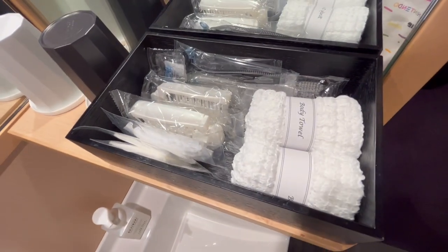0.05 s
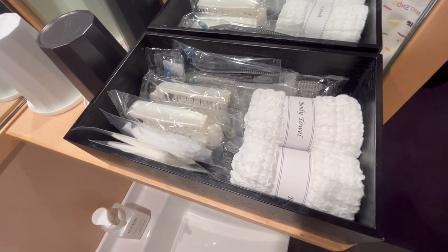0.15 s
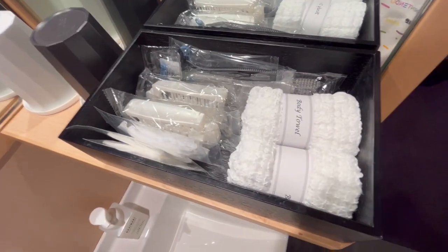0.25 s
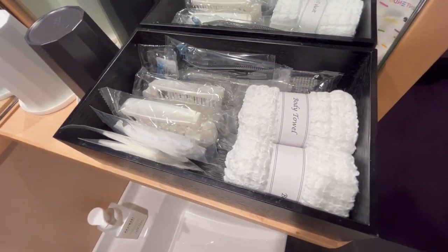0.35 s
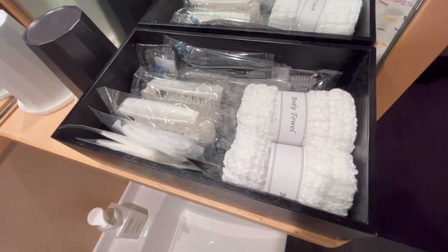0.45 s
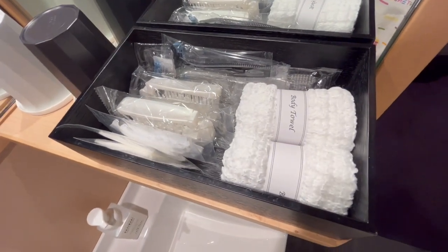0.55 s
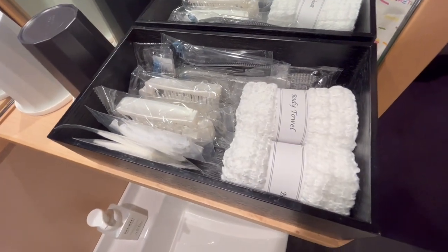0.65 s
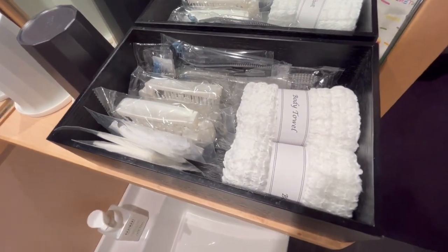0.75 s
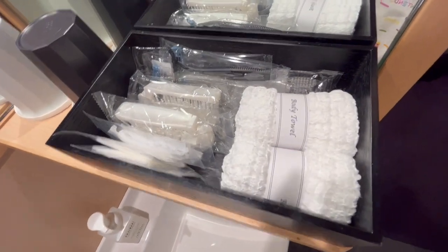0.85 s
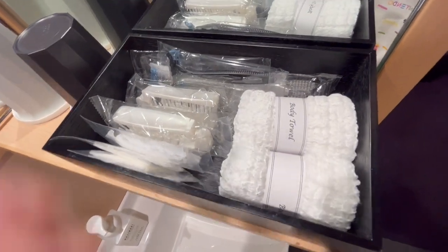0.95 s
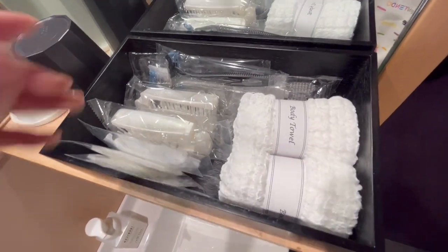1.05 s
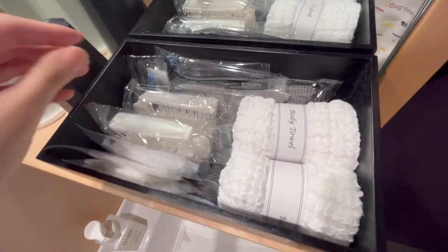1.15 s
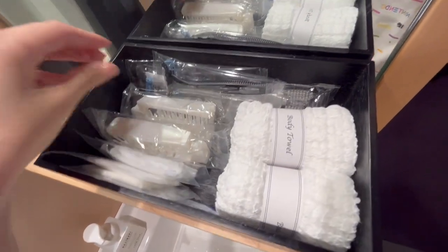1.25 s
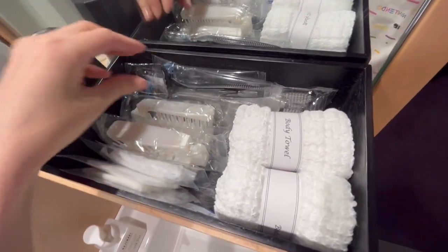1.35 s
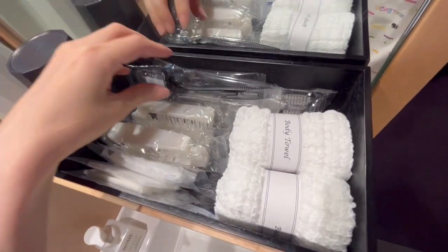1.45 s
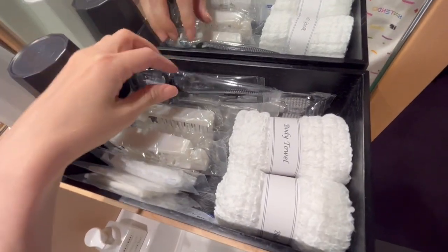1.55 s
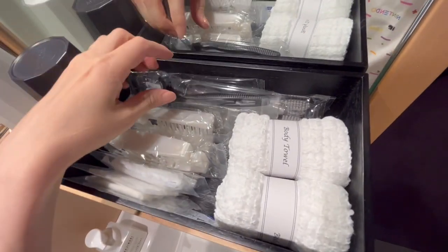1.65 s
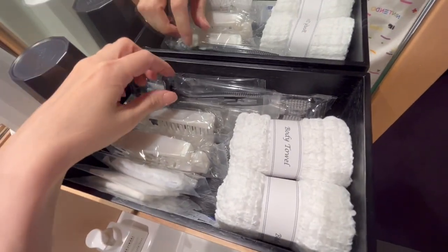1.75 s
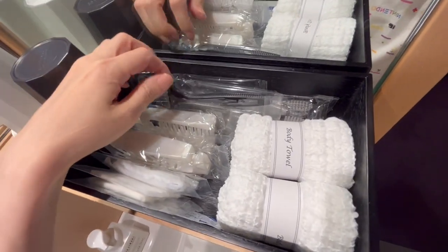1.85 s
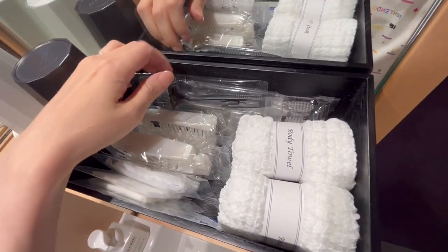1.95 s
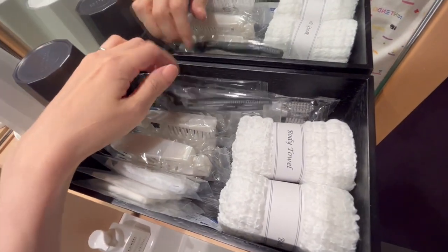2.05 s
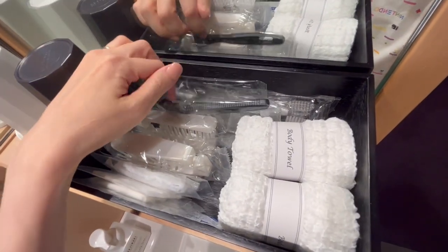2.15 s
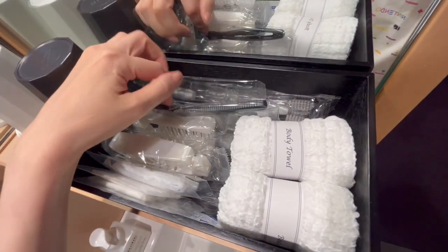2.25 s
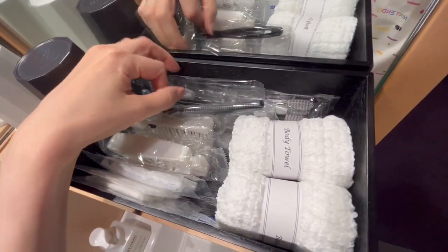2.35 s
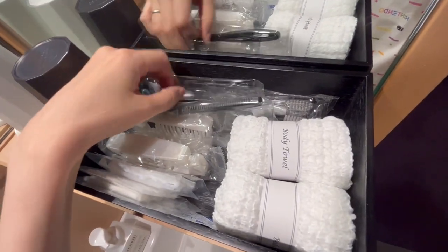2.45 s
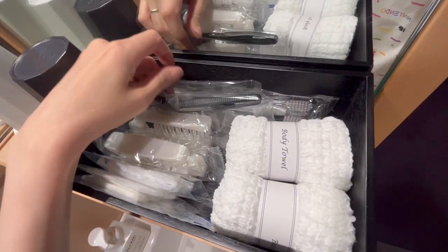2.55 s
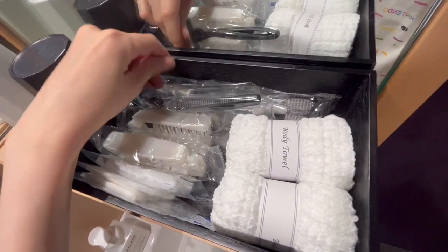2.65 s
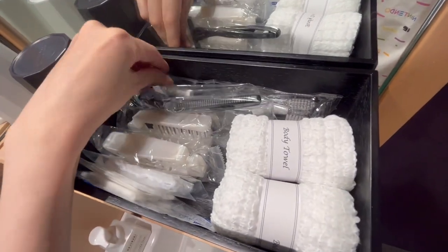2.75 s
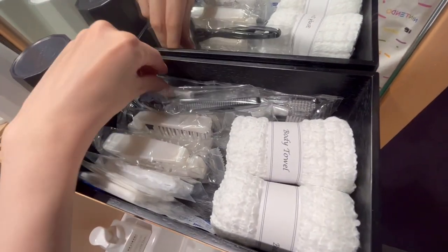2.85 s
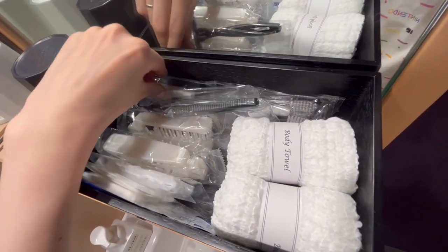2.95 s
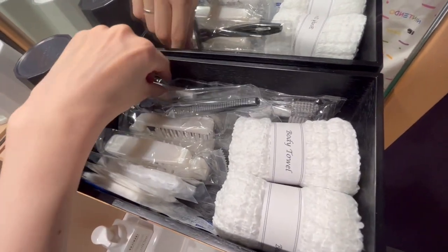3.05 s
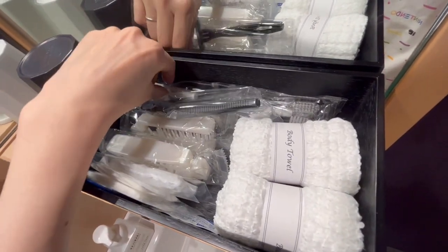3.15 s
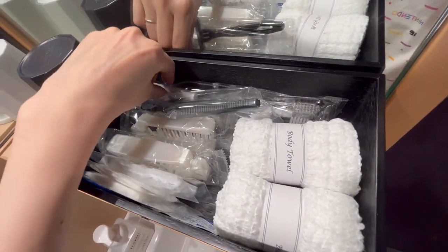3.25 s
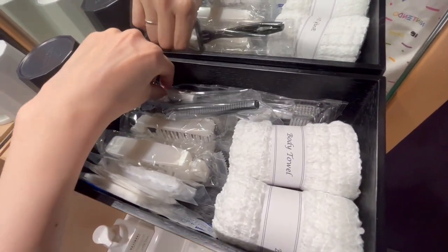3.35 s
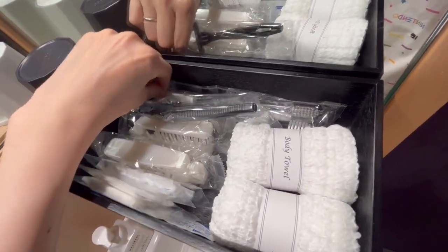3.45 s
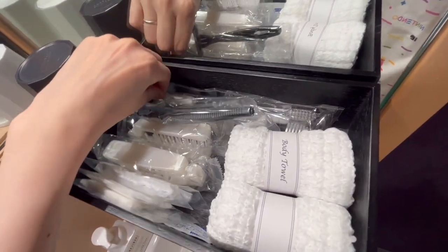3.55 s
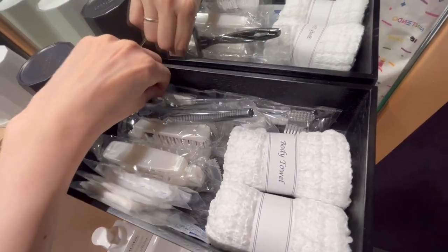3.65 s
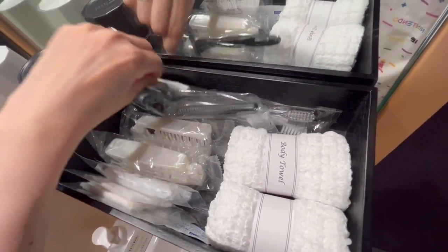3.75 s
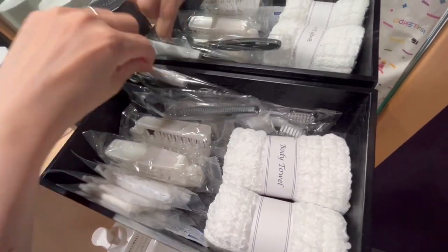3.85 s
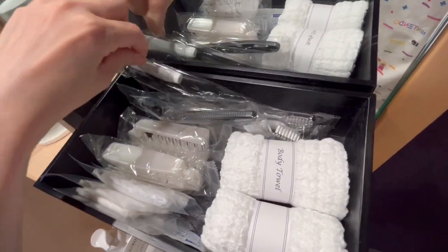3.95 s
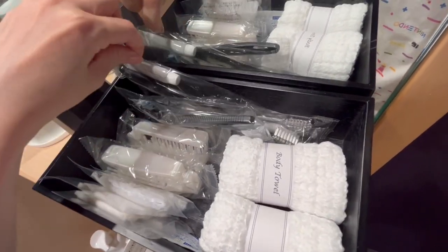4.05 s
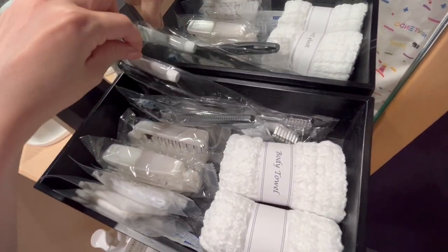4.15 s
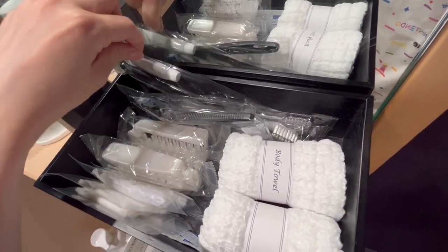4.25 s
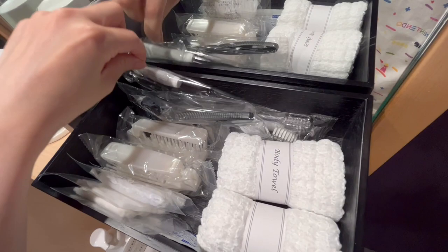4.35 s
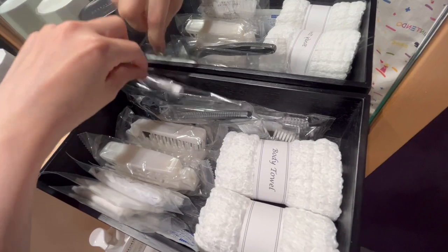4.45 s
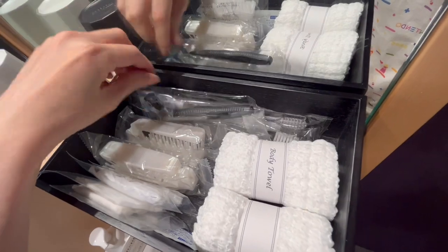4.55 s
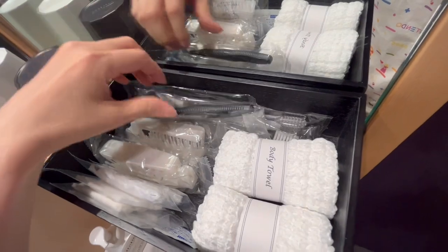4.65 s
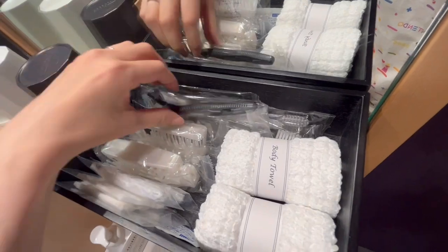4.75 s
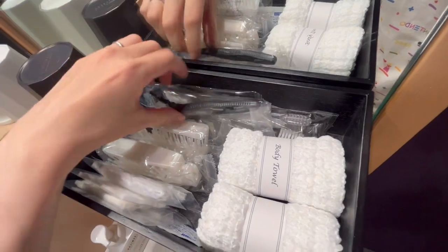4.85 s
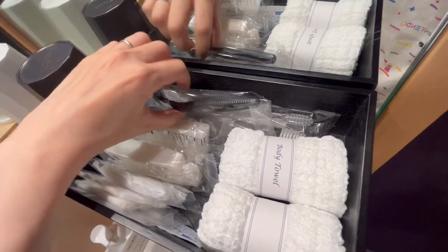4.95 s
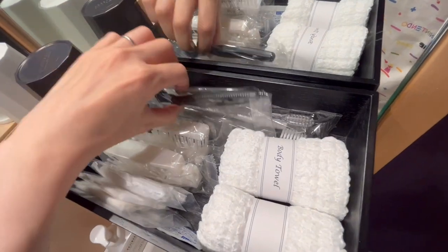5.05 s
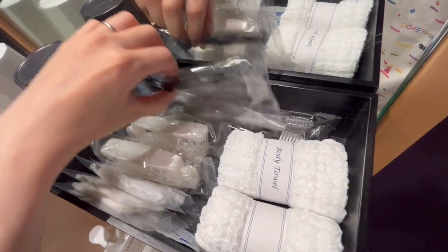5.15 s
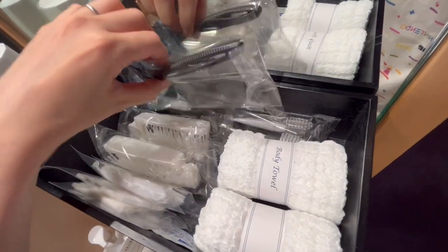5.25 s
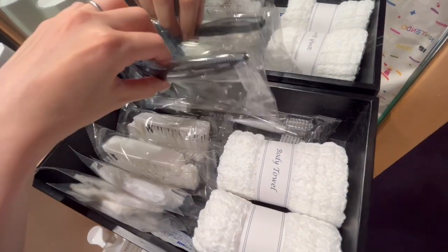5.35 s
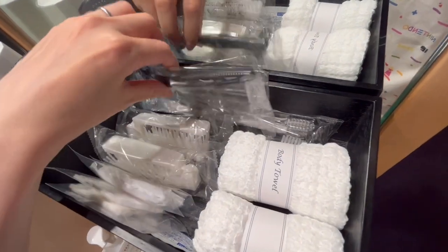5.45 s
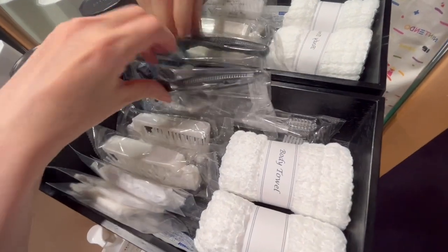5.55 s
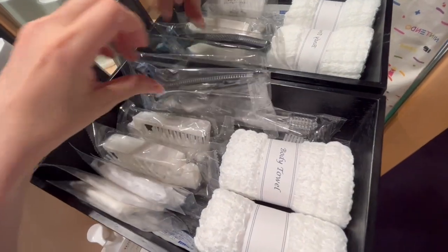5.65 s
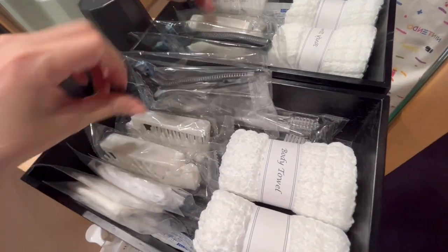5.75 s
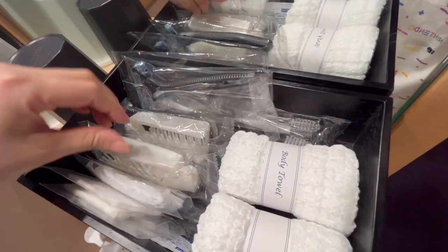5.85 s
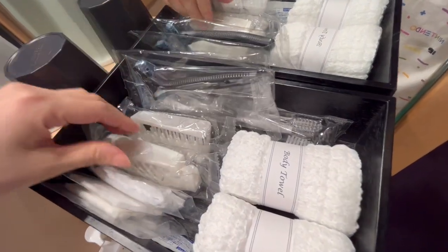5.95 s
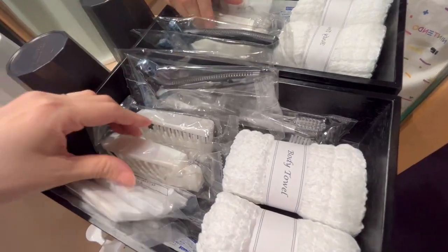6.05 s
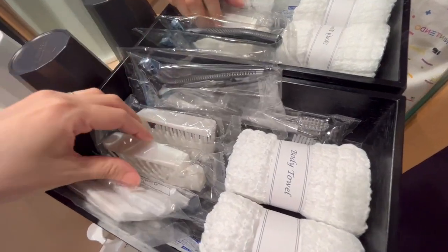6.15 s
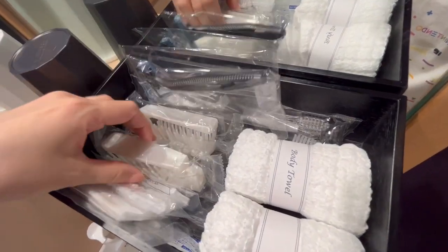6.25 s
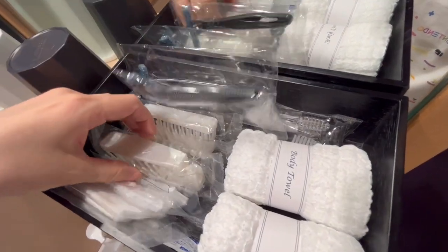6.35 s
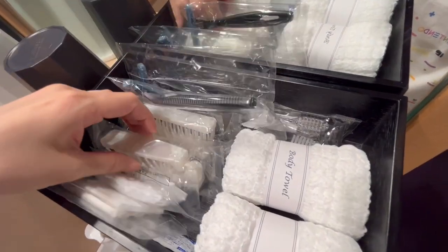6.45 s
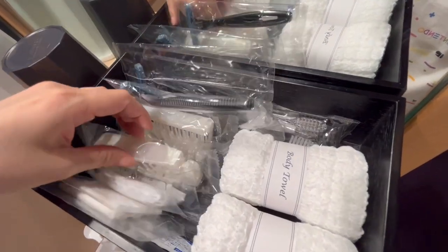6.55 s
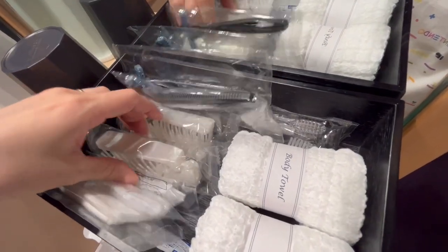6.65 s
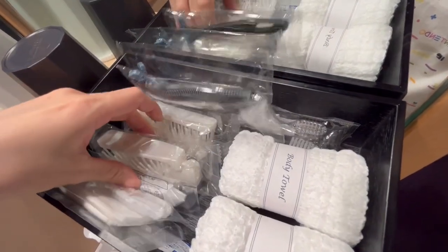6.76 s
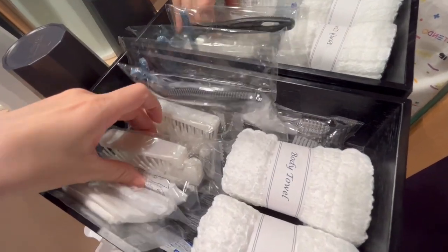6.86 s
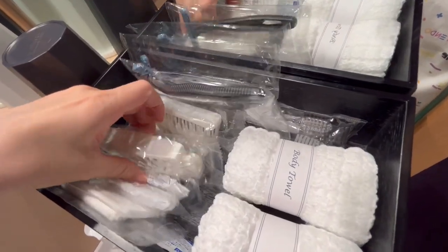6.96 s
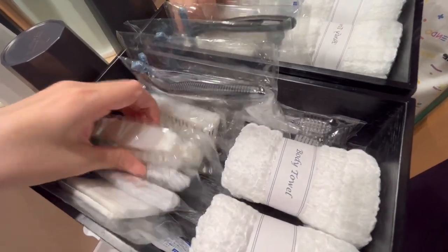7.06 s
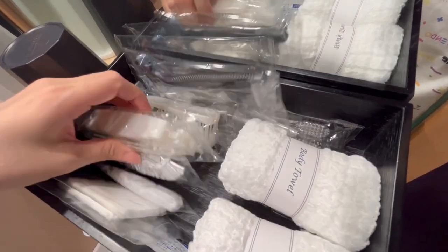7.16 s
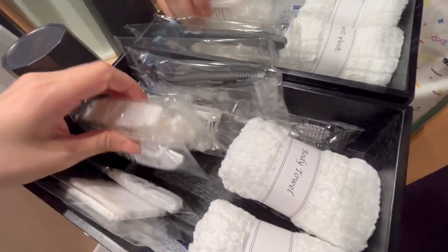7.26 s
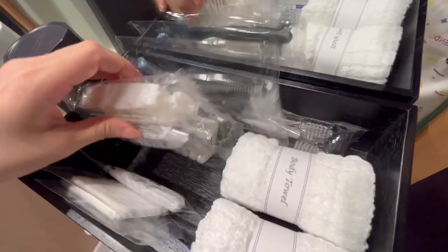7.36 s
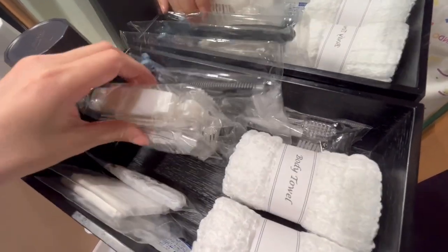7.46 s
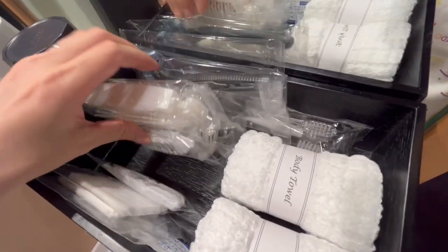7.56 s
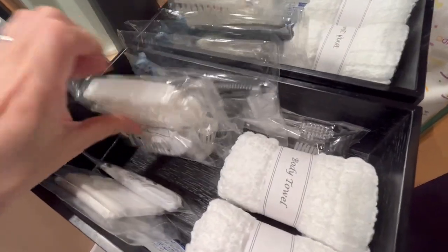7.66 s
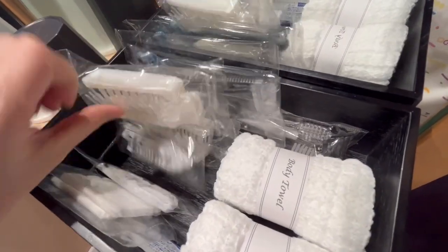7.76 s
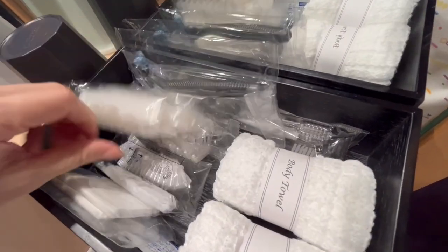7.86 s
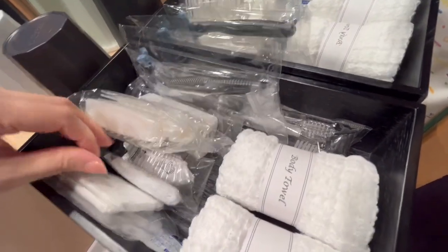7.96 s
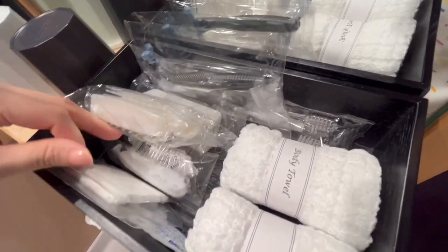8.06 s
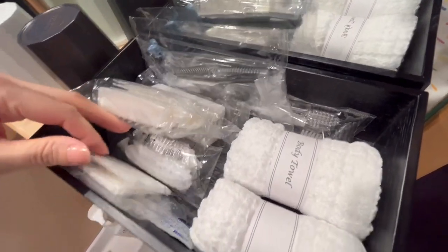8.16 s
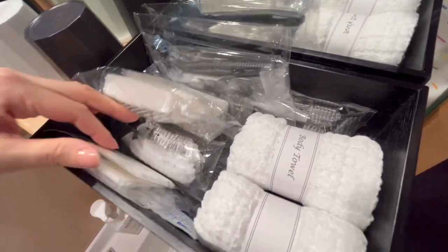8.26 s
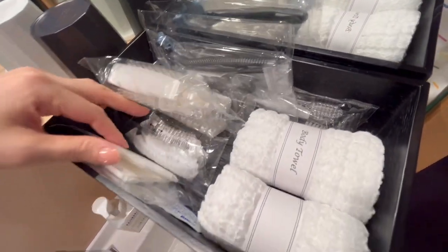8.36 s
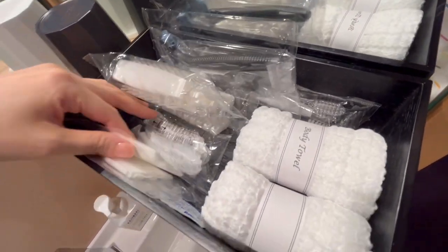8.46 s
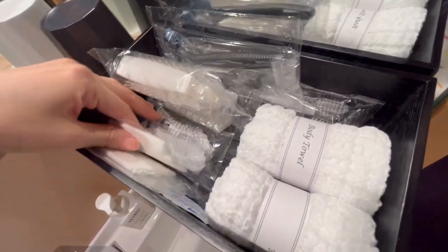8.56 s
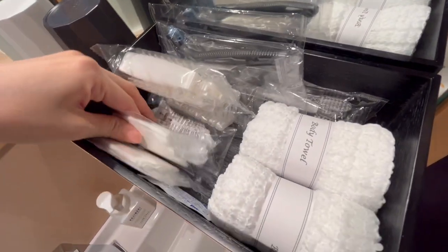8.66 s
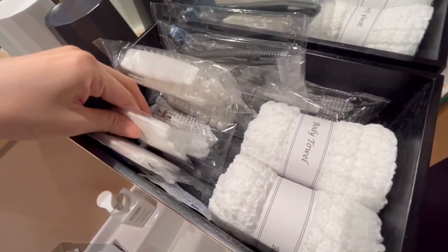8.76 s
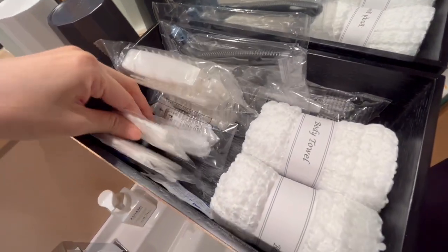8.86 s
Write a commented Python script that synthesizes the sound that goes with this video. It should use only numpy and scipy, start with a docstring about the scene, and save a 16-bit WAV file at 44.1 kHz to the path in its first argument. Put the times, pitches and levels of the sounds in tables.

```python
"""Thin plastic wrappers crackle as a hand rummages through them in a shallow tray.
Creases in the film buckle: a few give loud snaps, thousands of small ones make a dense crackle.
Packets knock the tray and make it ring. A sleeve rustles faintly before the hand starts.
A stereo microphone hears it from close by, in a small room with short echoes and humming ventilation."""
import sys
import numpy as np
from scipy import signal
from scipy.fft import rfft, irfft, next_fast_len
from scipy.io import wavfile
from scipy.ndimage import map_coordinates

SR = 44100
rng = np.random.default_rng(int(sys.argv[2]) if len(sys.argv) > 2 else 0)


def digitize_waveform(pressure):
    """Quantize a signal to 16-bit integers and store it at the path in sys.argv[1].

    Rows of a 2-D input are taken as channels; values are limited to [-1, 1].
    """
    field = np.atleast_2d(pressure).T
    bounded = np.clip(field, -1, 1)
    quanta = np.round(bounded * 32767).astype(np.int16)
    wavfile.write(sys.argv[1], SR, quanta)


N = 393372

# The tone of the plastic film. Each row: frequency in Hz, level in dB.
FILM_TONE = [(530, -35.5), (900, -7.5), (1020, -13.5), (1620, -9.5), (1790, -13.5), (2100, -7),
             (2860, -6.5), (4610, -3.5), (8220, -10.5), (9890, -10.5), (12500, -22.5), (15400, -20),
             (16200, -36.5), (17000, -40.5)]
# How many seconds sooner the "hand" and the "air" are heard on the left.
LEFT_LEAD = {"hand": 0.000197, "air": .0004}


def amp(db):
    """Turn decibels into a gain."""
    return 10 ** (np.asarray(db) / 20)


def unit(x):
    """Scale a sound to an average power of 1."""
    return x / np.sqrt(np.mean(x ** 2) + 1e-20)


def along(points, hz):
    """Read between (Hz, value) points on a log frequency axis."""
    f, v = np.transpose(points)
    return np.interp(np.log(hz + 1), np.log(f + 1), v)


def filtered(x, response):
    """Change each frequency's level and phase by response(hz)."""
    m = next_fast_len(N + SR // 2)
    return irfft(rfft(x, m) * response(np.fft.rfftfreq(m, 1 / SR)), m)[..., :N]


def lagged(hz, seconds):
    """A response that puts the left channel ahead of the right."""
    return np.exp(1j * np.pi * seconds * np.outer([1, -1], hz))


def wobble(rate):
    """A smooth curve through `rate` random points a second."""
    return map_coordinates(rng.standard_normal(int(N * rate / SR) + 4), [np.arange(N) * rate / SR])


def placed(starts, sounds):
    """Add up short sounds, each at its start in seconds."""
    at = np.round(starts * SR).astype(int)[:, None] + np.arange(sounds.shape[1])
    return np.bincount(at.ravel(), sounds.ravel(), N + SR)[:N]


def ventilation(level_db=-64):
    """Steady hum and hiss, most alike on both sides in the bass."""
    # Each row: frequency in Hz, level in dB.
    tone = [(25, -21.5), (35, -20.5), (52, 2.5), (95, -5.5), (130, -1), (200, -11), (310, -12.5),
            (500, -17.5), (640, -28), (1100, -35.5), (2500, -40), (4500, -43), (10500, -46.5), (12000, -56),
            (17000, -65)]
    # Each row: frequency in Hz, how alike left and right are (-1 to 1).
    likeness = [(60, 0.88), (240, 0.65), (950, -0.59), (3770, 0.44), (15000, 0.35)]
    angle = lambda hz: np.arccos(np.clip(along(likeness, hz), -1, 1)) / 2
    split = lambda hz: amp(along(tone, hz)) * [np.cos(angle(hz)), np.sin(angle(hz))]
    mid, side = filtered(rng.standard_normal((2, N)), split)
    pair = filtered(np.array([mid + side, mid - side]), lambda hz: lagged(hz, LEFT_LEAD["air"]))
    return amp(level_db + 0.33 * wobble(3.03)) * pair / np.std(mid)


def room_echo():
    """The room's answer to one click: the click, near echoes, then a fading tail."""
    # Echoes off the tray sides and a mirror. Each row: delay in seconds, level in dB.
    echoes = [(.0012, -8.5), (.0036, -7.5), (.008, -17.5)]
    # Each row: frequency in Hz, seconds to fade by 60 dB.
    fade_times = [(200, 0.21), (1400, 0.26), (3700, 0.25), (9700, 0.1)]
    hz, t, noise = signal.stft(rng.standard_normal((2, SR // 3)), SR, nperseg=256)
    tail = signal.istft(noise * amp(-60 * t / along(fade_times, hz)[:, None]), SR, nperseg=256)[1]
    out = np.pad(amp(-8.5) * tail / np.linalg.norm(tail[0]), ((0, 0), (SR // 250, 0)))
    out[:, 0] = 1
    for seconds, db in echoes:
        delays = seconds * SR * (1 + .2 * rng.standard_normal(2))
        out[[0, 1], delays.astype(int).clip(1)] += amp(db)
    return out


def room(x, block=5000):
    """Each block of samples gets new echoes, as hand and microphone move."""
    out = np.zeros((2, N + SR))
    for at in range(0, N, block):
        echoed = signal.fftconvolve(x[:, at:at + block], room_echo(), axes=1)
        out[:, at:at + echoed.shape[1]] += echoed
    return out[:, :N]


def from_left(x):
    """The hand is nearer the left side: earlier there, and louder below the treble."""
    # Each row: frequency in Hz, left minus right in dB.
    balance = [(60, 1.5), (110, 8.5), (200, 4.5), (380, 3.5), (700, 12), (1290, 5), (2380, 2), (4400, 4),
               (8120, -3), (15000, -0.5)]
    gains = lambda hz: amp(np.outer([.5, -.5], along(balance, hz)))
    return filtered(x, lambda hz: gains(hz) * lagged(hz, LEFT_LEAD["hand"]))


def sleeve():
    """Cloth brushes softly as the arm starts to move."""
    # Each row: time in seconds, level in dB.
    swell = [(.48, -100), (.52, -79.5), (.59, -95), (.63, -95), (.66, -84), (.72, -86), (.76, -100)]
    times, db = np.transpose(swell)
    cloth = unit(filtered(rng.standard_normal((2, N)), lambda hz: amp(along(FILM_TONE, hz))))
    return amp(np.interp(np.arange(N) / SR, times, db, left=-130, right=-130)) * cloth


def pushes(starts, db, rise):
    """Brief pushes, up or down at random, that peak after `rise` seconds."""
    t = np.arange(200) / SR
    sign = np.sign(rng.standard_normal((len(starts), 1)))
    return placed(starts, sign * amp(db)[:, None] * t / rise * np.exp(1 - t / rise))


def rings(starts, db, hz, fade, rise):
    """Hard plastic rings dully, dropping 60 dB in `fade` seconds."""
    t = np.arange(SR // 16) / SR
    ring = np.sin(2 * np.pi * hz[:, None] * t) * amp(-60 * t / fade) * (1 - np.exp(-t / rise))
    return placed(starts, amp(db)[:, None] * ring)


def content_pitches(count, middle_hz):
    """Combs and brushes in the tray ring at a different pitch wherever they are touched."""
    return middle_hz * 2 ** (0.609 * rng.standard_normal(count))


def tray(f):
    """The filled tray shakes most easily near a few pitches."""
    # Each row: pitch in Hz, width in Hz, level in dB.
    resonances = [(142.6, 67, -14), (258, 73, -7), (473, 125, -1), (879, 87, -3), (1190, 243, -4.5),
                  (1944, 960, -7)]
    return sum((-1) ** k * amp(db) * 1j * f * width / (hz * hz - f * f + 1j * f * width)
               for k, (hz, width, db) in enumerate(resonances))


def knocks():
    """Packets hit the tray: it rings, with one pitch loudest for each spot struck."""
    # Each row: start in seconds, level in dB, loudest pitch in Hz.
    hits = [(1.619, -40, 864), (1.627, -36.5, 1320), (2.3, -41.5, 842), (2.68, -28, 486), (2.687, -37, 250),
            (3.01, -46, 865), (3.381, -32, 853), (3.394, -26.5, 1590), (3.712, -35, 567),
            (4.36, -23.5, 480), (4.392, -33.5, 177), (5.131, -35.5, 210), (5.339, -37.5, 610),
            (5.376, -32.5, 380), (5.378, -30.5, 1420), (6.07, -38, 567), (6.178, -39, 623),
            (6.279, -30.5, 573), (6.375, -21.5, 470), (6.379, -32, 202), (6.582, -39, 807),
            (6.841, -30, 836), (6.909, -28.5, 887), (7.01, -25.5, 455), (7.025, -29, 870),
            (7.199, -33, 486), (7.23, -30.5, 840), (7.26, -31.5, 534), (7.298, -18, 453),
            (7.749, -36.5, 650), (7.775, -37.5, 480), (7.839, -30.5, 790), (7.997, -33, 682),
            (8.765, -37.5, 560)]
    starts, db, hz = np.transpose(hits)
    thuds = filtered(pushes(starts, db + 6.5, rise=0.00033), tray)
    return rings(starts, db, hz, fade=0.042, rise=0.0012) + thuds


def crease_clicks(treble_db, fade, spread, size=192):
    """Each crease buckles with a dying burst of noise; tight creases are brighter."""
    t, hz = np.arange(size) / SR, np.fft.rfftfreq(size, 1 / SR) + 1
    noise = rng.standard_normal((len(treble_db), 2, size))
    burst = noise * amp(-60 * t / fade) * (1 - np.exp(-t / 0.00061)) ** 2
    brightness = amp((treble_db[:, None, None] + 9) / (1 + (7500 / hz) ** 8))  # acts above 7.5 kHz
    click = irfft(rfft(np.roll(burst, 16, axis=2)) * brightness * amp(along(FILM_TONE, hz)), size)
    click = 2.97 * click / np.linalg.norm(click, axis=2, keepdims=True)  # peak near 1
    mid, side = click[:, 0], spread * click[:, 1]
    return mid + side, mid - side


def crackle(count=4000):
    """Small creases give way in clumps as the hand moves, shaking tray and contents too."""
    # Each row: time in seconds, crackle level in dB, tray rumble level in dB.
    handling = [(1.42, -102, -92), (1.49, -65, -59), (1.57, -66, -59), (1.64, -53, -60), (1.72, -51.5, -52),
                (1.79, -58, -63), (1.86, -66.5, -61.5), (1.94, -70, -68), (2.01, -58, -60.5),
                (2.09, -53, -49.5), (2.16, -55, -57.5), (2.23, -63, -60.5), (2.308, -46, -49.5),
                (2.38, -63, -54.5), (2.46, -37, -48), (2.53, -56, -55), (2.61, -52, -49.5),
                (2.68, -68, -68), (2.75, -63, -61), (2.83, -54, -58.5), (2.9, -50.5, -48), (2.98, -55, -56),
                (3.05, -50.5, -57), (3.12, -49.5, -59.5), (3.2, -60, -61), (3.27, -60, -57),
                (3.35, -55.5, -60), (3.42, -44.5, -48), (3.49, -58.5, -57), (3.57, -65, -62),
                (3.64, -58.5, -55.5), (3.72, -47, -52), (3.79, -53, -61), (3.86, -55.5, -67),
                (3.94, -76, -65.5), (4.01, -60.5, -67), (4.09, -71.5, -85), (4.16, -97.5, -85),
                (4.23, -69.5, -64), (4.31, -53, -64), (4.38, -58, -52), (4.46, -43, -48.5),
                (4.529, -59.5, -52), (4.61, -84, -98), (4.68, -70, -61), (4.75, -69.5, -73),
                (4.83, -52, -48.5), (4.9, -49.5, -54.5), (4.98, -55, -54.5), (5.05, -46.5, -54.5),
                (5.12, -56.5, -47), (5.2, -49, -49), (5.27, -53.5, -57.5), (5.35, -66, -57),
                (5.42, -55.5, -61), (5.49, -66, -60.5), (5.57, -67, -75), (5.64, -90, -71),
                (5.72, -73.5, -82), (5.79, -99, -76), (5.86, -88, -80), (5.94, -65, -63), (6.01, -59, -58),
                (6.09, -63, -56), (6.16, -45.5, -53), (6.23, -56, -51), (6.31, -73, -63),
                (6.38, -54.5, -44.5), (6.46, -49, -44.5), (6.53, -65, -55), (6.61, -48, -45.5),
                (6.68, -51.5, -47), (6.75, -58.5, -49), (6.83, -54, -55), (6.9, -40, -44.5),
                (6.98, -46.5, -45.5), (7.05, -49, -40.5), (7.12, -47, -52), (7.2, -53, -47.5),
                (7.27, -46, -50.5), (7.35, -53, -44.5), (7.42, -43, -45.5), (7.49, -60.5, -55),
                (7.57, -73, -74), (7.641, -48, -54), (7.72, -60.5, -63), (7.79, -56.5, -62),
                (7.86, -50, -56), (7.94, -71.5, -78), (8.01, -58, -57.5), (8.09, -75.5, -70),
                (8.16, -63, -63), (8.23, -61, -65.5), (8.31, -76, -57.5), (8.38, -64.5, -59.5),
                (8.46, -66.5, -69), (8.53, -68.5, -61), (8.61, -61, -66.5), (8.68, -60, -61),
                (8.75, -66.5, -62.5), (8.83, -63.5, -56.5), (8.92, -46.5, -59)]
    times, film_db, tray_db = np.transpose(handling)
    gain = lambda db: amp(np.interp(np.arange(N) / SR, times, db, left=-130))
    when, smallness, dullness = rng.random((count, 3)).T
    starts = times[0] + when * (times[-1] - times[0])
    clump_db = 4.2 * wobble(45)[(starts * SR).astype(int).clip(0, N - 1)]
    size_db = -3.2 * np.log(smallness + 0.0054) + clump_db
    clicks = crease_clicks(-17 * dullness, fade=0.0029, spread=0.92)
    film = unit(np.array([placed(starts, amp(size_db)[:, None] * side) for side in clicks]))
    shakes, shake_db = starts[::4], size_db[::4] * 0.46  # every fourth crease
    rumble = unit(filtered(pushes(shakes, shake_db, rise=.00008), tray))
    rattle = unit(rings(shakes, shake_db, content_pitches(len(shakes), 536.94), fade=0.026, rise=0.00081))
    return gain(film_db) * film + gain(tray_db) * unit(rumble + 0.66 * rattle)


def snaps():
    """Loud creases snap and tap what they wrap, too lightly to stir the tray's deepest tones."""
    # Each row: start in seconds, then snap level, treble share and tap level, all in dB.
    creases = [(1.4539, -56, 0, -74), (1.5002, -35.5, -2, -52), (1.5129, -27.5, -10, -33),
               (1.6195, -10, -9.5, -31), (1.7244, -18, 0.5, -49), (1.7895, -43, -30, -56),
               (1.831, -32.5, -16, -55), (1.8912, -46.5, 4, -51), (1.9962, -25, -2, -33),
               (2.0681, -18.5, 5, -39), (2.1103, -17, -5, -40), (2.1551, -17.5, -2, -48),
               (2.2685, -13, -1.5, -38), (2.3855, -28.5, -18.5, -50), (2.403, -26.5, -4, -55),
               (2.4335, -21.5, 0.5, -46), (2.4485, -19, -5, -41), (2.4645, -25, -4, -40),
               (2.48, -26.5, -14.5, -37), (2.5399, -21.5, -2, -50), (2.5555, -19, -1.5, -44),
               (2.5674, -26.5, -4, -31), (2.6969, -16.5, -3, -37), (2.7297, -23.5, 4.5, -33),
               (2.8386, -37, 5, -37), (2.8534, -18.5, -8.5, -26), (2.9949, -26.5, -4, -30),
               (3.0138, -21.5, -12.5, -26.5), (3.0413, -43, -8, -36), (3.0638, -26, -20, -40),
               (3.0773, -23.5, -4.5, -31), (3.108, -29, -1.5, -49), (3.186, -32.5, -4, -38),
               (3.272, -29.5, -12, -34), (3.3481, -40.5, -7, -34.5), (3.383, -17.5, -9.5, -20),
               (3.3932, -20, -17, -36), (3.452, -29, -13, -43), (3.506, -28, -0.5, -47),
               (3.6159, -24, -13, -52), (3.65, -20.5, -16, -39), (3.666, -30, -14.5, -51),
               (3.7111, -16.5, -8.5, -51), (3.7414, -22.5, -21, -35), (3.888, -50.5, -29, -56),
               (3.9754, -23, -10, -64), (4.045, -40.5, -31, -63), (4.203, -46.5, -18, -57),
               (4.2645, -33.5, -12, -60), (4.396, -29, -13, -47), (4.4061, -15.5, -2, -41),
               (4.4272, -27.5, -5, -45), (4.4695, -27, -11, -28), (4.4974, -21.5, -10, -26),
               (4.6847, -38, -4, -41), (4.7936, -38, -7, -48), (4.809, -32.5, 0, -30),
               (4.8178, -27.5, -11, -24.5), (4.8456, -30, 2, -48), (4.863, -17.5, 5, -38),
               (4.921, -34.5, -8, -54), (4.9288, -28, -10, -34), (4.947, -27, -3, -31),
               (4.958, -29, -10, -43), (4.978, -19, -2.5, -29), (5.046, -32, -5, -31),
               (5.1016, -19.5, -2.5, -36), (5.111, -33, -19, -34), (5.198, -35, -7, -48),
               (5.211, -28.5, -16, -29.5), (5.279, -42, -15, -49), (5.3415, -21.5, -13, -48),
               (5.3767, -24.5, -6, -27), (5.4294, -35, -12, -45), (5.4558, -26.5, -5, -33),
               (5.56, -40, -10, -38), (5.6536, -31.5, -12, -36), (5.9359, -45, -7, -49),
               (5.9436, -24, -1.5, -55), (5.974, -35, -12, -34), (6.006, -25, 0, -45),
               (6.0166, -18.5, 0, -56), (6.0691, -35, -12, -33), (6.0951, -25.5, -1, -32),
               (6.1385, -39, -13, -43), (6.1624, -26, 0, -40), (6.181, -24.5, -16, -26),
               (6.2061, -25.5, -11, -47), (6.2136, -23.5, -22, -41), (6.2192, -26.5, -23, -30.5),
               (6.2567, -31, -6, -46), (6.2747, -41, -11, -53), (6.2798, -17.5, -3, -25),
               (6.2852, -27, -11, -42), (6.2994, -26.5, -17, -34), (6.314, -35, -3, -43),
               (6.3271, -22, -12, -29), (6.387, -26, -6.5, -39), (6.402, -18.5, -7.5, -28),
               (6.4225, -20, -6, -40), (6.4363, -22.5, -13, -34), (6.4671, -26, -18, -37),
               (6.4755, -24.5, -13, -42.5), (6.4915, -25, -11, -34), (6.5853, -17.5, -7, -50),
               (6.6046, -27, -21, -27.5), (6.6511, -23, -23, -30), (6.6685, -15.5, -2.5, -31),
               (6.7222, -19, 4, -45), (6.7951, -38, -3, -47), (6.8017, -33, 6, -51), (6.8086, -26, -7, -40),
               (6.8313, -20.5, -7.5, -35), (6.8359, -15.5, -11, -38), (6.8503, -20.5, -6.5, -36),
               (6.86, -27, -18, -33), (6.8736, -20, -10, -25), (6.8844, -20, -6, -35),
               (6.9126, -36, -10, -19.5), (6.933, -17.5, -14, -30), (6.9876, -39, -23, -37),
               (6.998, -27, -2, -35), (7.0115, -19, -6, -24), (7.039, -20, 3, -21.5),
               (7.0569, -34, -14, -41), (7.0923, -41, -10, -48), (7.1, -25, -1, -38),
               (7.114, -19.5, 3, -29), (7.2, -14, -1, -19.5), (7.2297, -36, -6, -31),
               (7.262, -24.5, -7, -25), (7.2702, -16.5, -25, -25), (7.2994, -21, -20, -11),
               (7.3356, -22, -17, -45), (7.3972, -30, -6, -28), (7.4137, -45, -10, -41),
               (7.4278, -29, -16, -38), (7.4375, -34, -7, -34), (7.479, -26.5, -4, -36),
               (7.4953, -41, -28, -50), (7.632, -44, -13, -46), (7.7512, -25, -11, -29),
               (7.842, -14, -20, -33), (7.988, -38, -5, -34.5), (7.999, -18, -19, -33),
               (8.1917, -36, -21, -31.5), (8.3062, -38.5, -23, -51), (8.3396, -42.5, -9, -40.5),
               (8.3991, -33.5, -18, -38.5), (8.495, -40, -5, -58), (8.532, -30.5, 6, -55),
               (8.5449, -30.5, -5, -29.5), (8.5813, -27.5, -7, -39), (8.6819, -31, -6, -49),
               (8.688, -26, 0, -46), (8.7012, -30, -5, -47), (8.7455, -36.5, 8, -65),
               (8.8282, -39, -24, -45), (8.871, -38.5, 2, -45), (8.917, -36, -1, -40)]
    starts, db, treble_db, tap_db = np.transpose(creases)
    thin_tray = lambda hz: tray(hz) * 1j * hz / (700 + 1j * hz)
    taps = filtered(pushes(starts, tap_db + 15.5, rise=.00004), thin_tray)
    taps += rings(starts, tap_db - 5, content_pitches(len(starts), 1183.5), fade=0.0097, rise=0.00033)
    clicks = crease_clicks(treble_db, fade=0.0033, spread=0.37)
    return np.array([placed(starts, amp(db)[:, None] * side) for side in clicks]) + taps


def scene():
    """The rummaging echoes in the room, over the ventilation."""
    return from_left(room(crackle() + snaps() + knocks() + sleeve())) + ventilation()


def record(dry, bass_hz=25, top_hz=16900):
    """The microphone drops the deepest bass; the recorder cuts the highest treble."""
    return filtered(dry, lambda hz: (hz < top_hz) * (1j * hz / (bass_hz + 1j * hz)) ** 2)


dry = scene()
out = record(dry)
digitize_waveform(out)
```